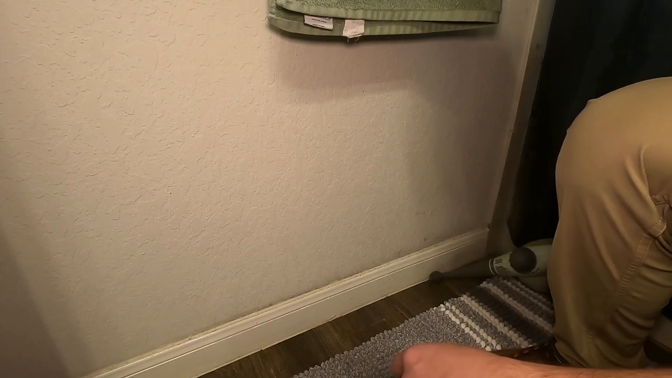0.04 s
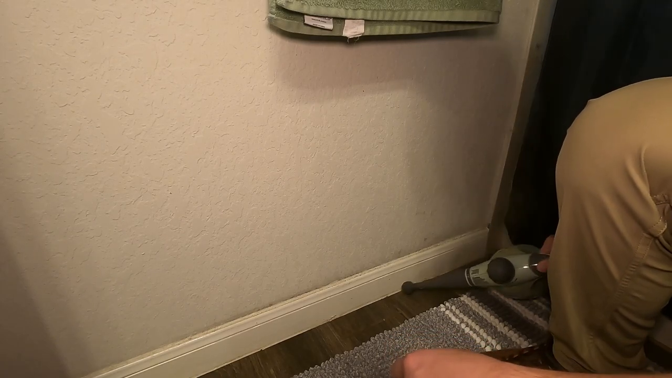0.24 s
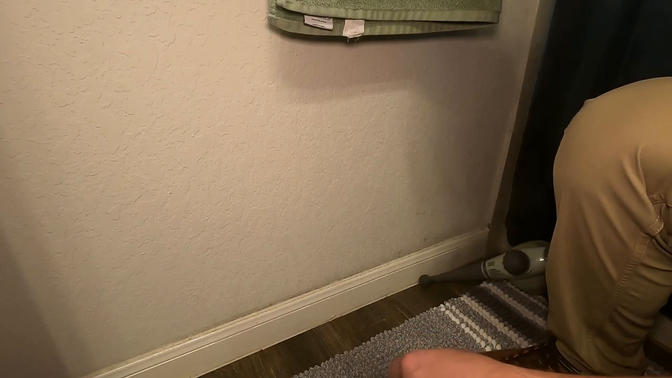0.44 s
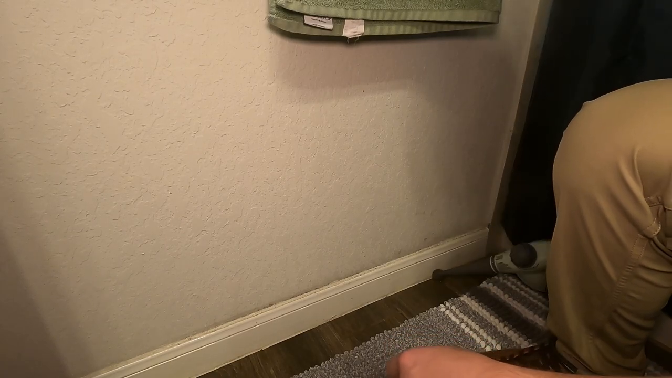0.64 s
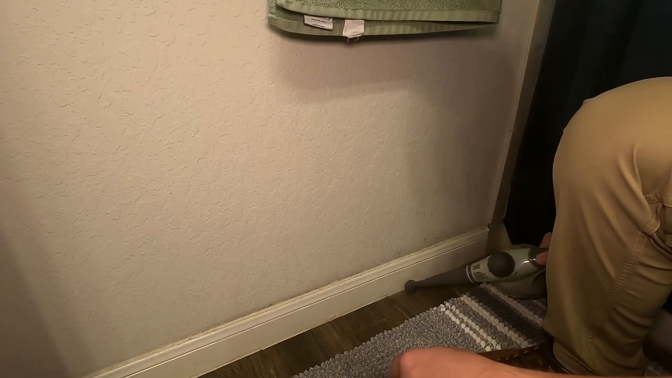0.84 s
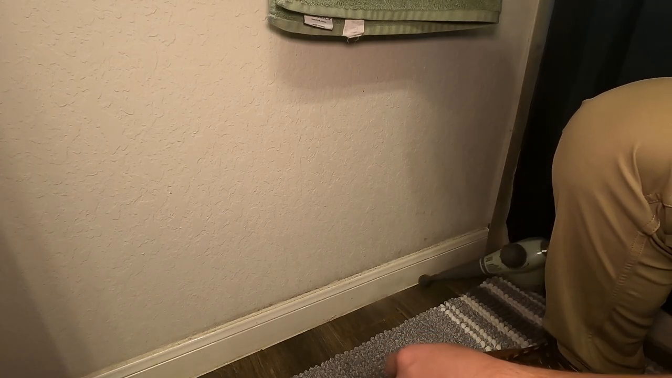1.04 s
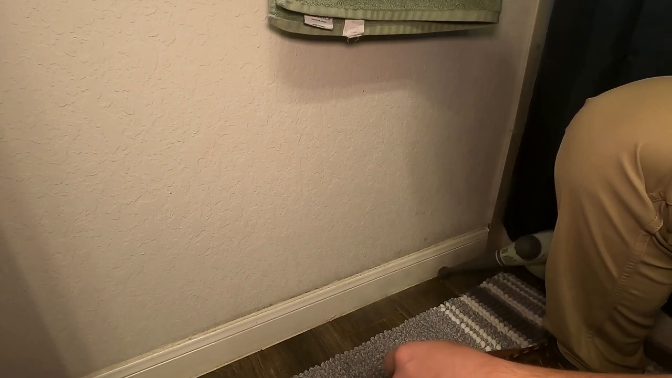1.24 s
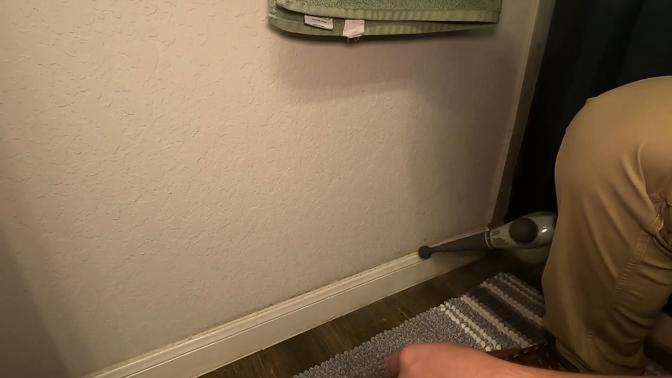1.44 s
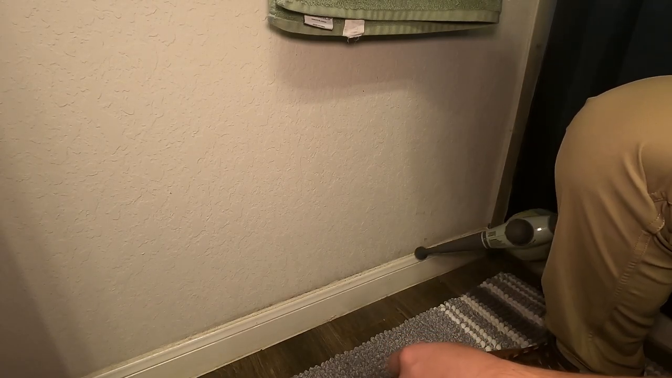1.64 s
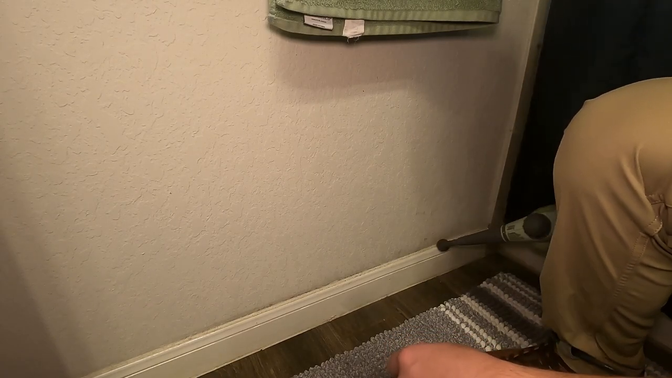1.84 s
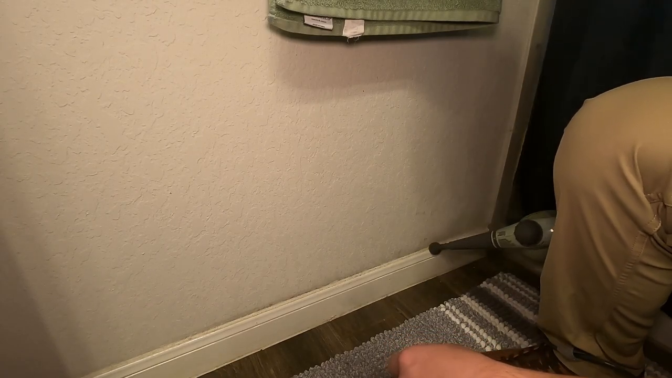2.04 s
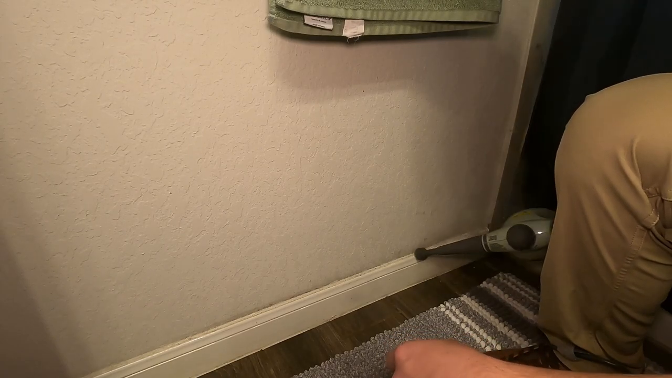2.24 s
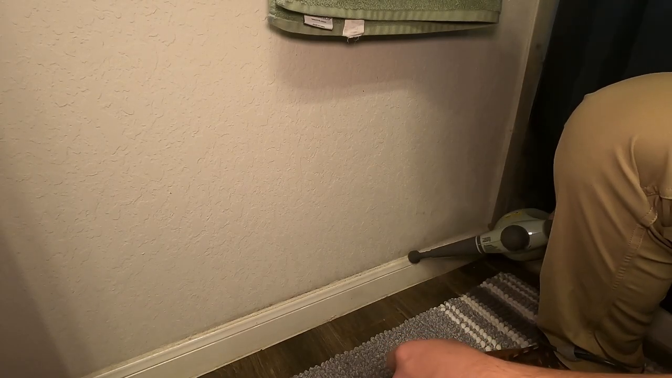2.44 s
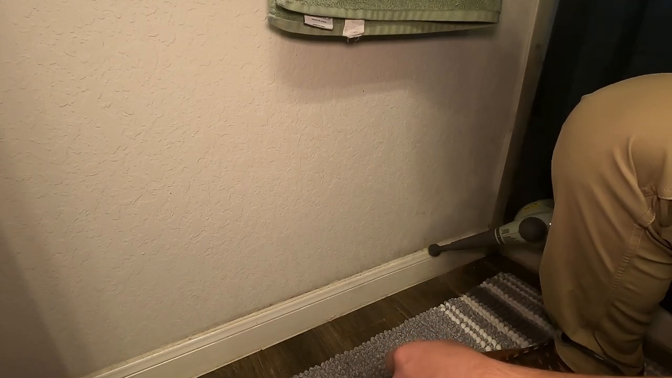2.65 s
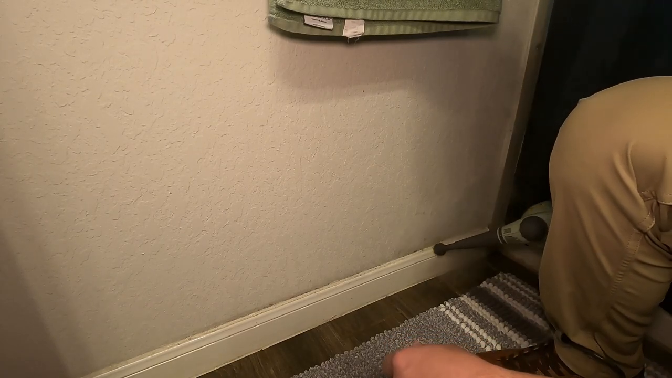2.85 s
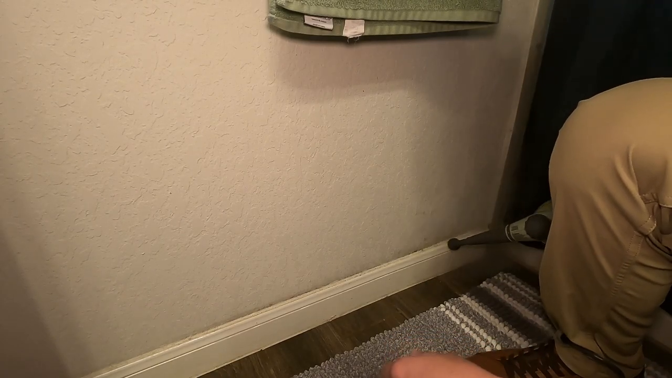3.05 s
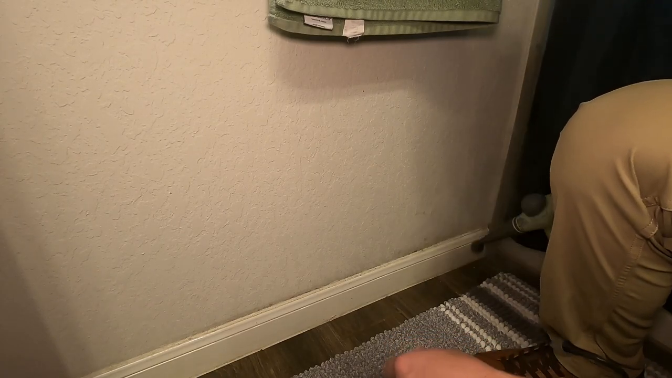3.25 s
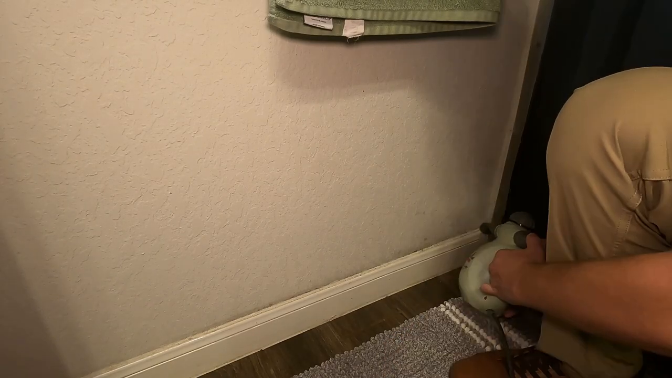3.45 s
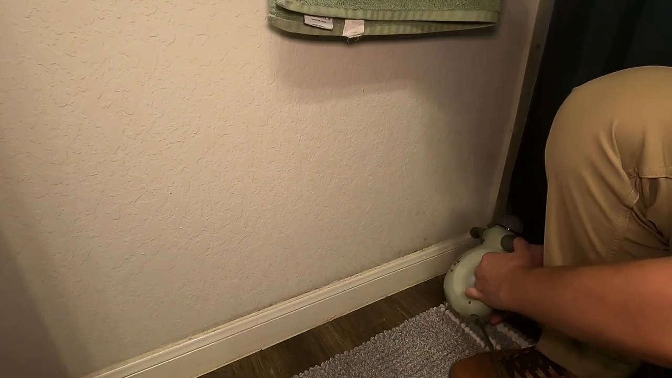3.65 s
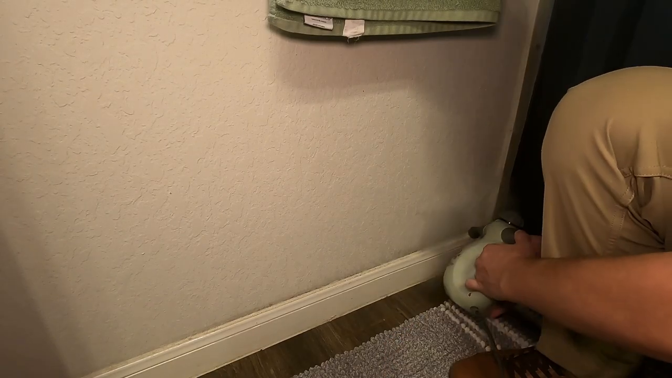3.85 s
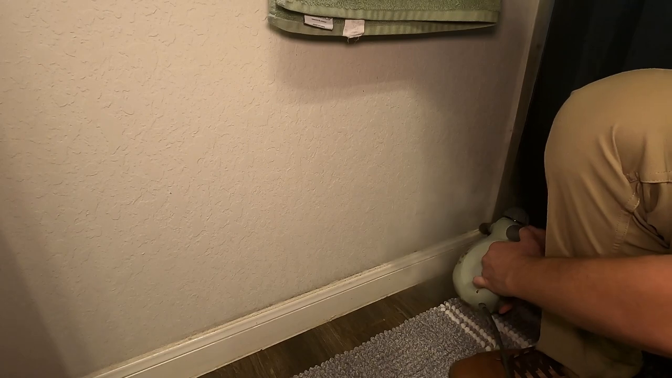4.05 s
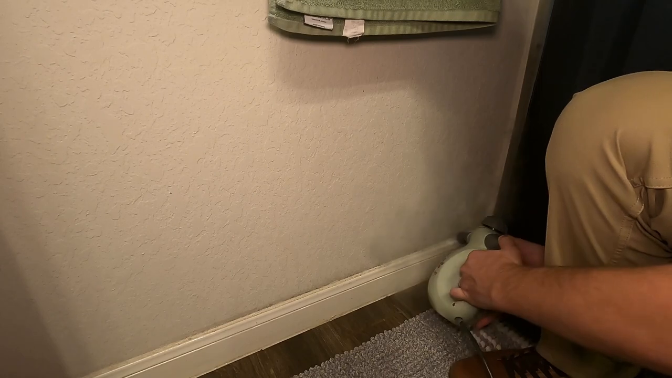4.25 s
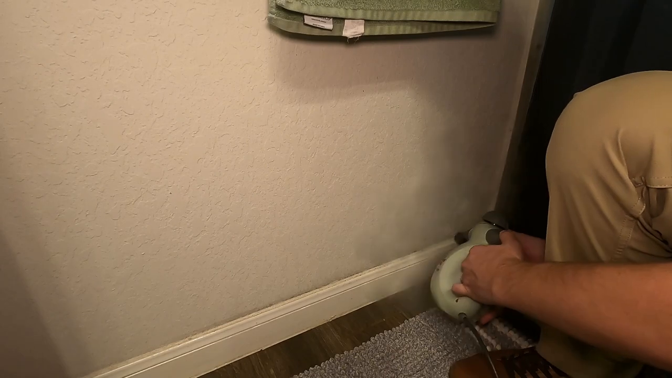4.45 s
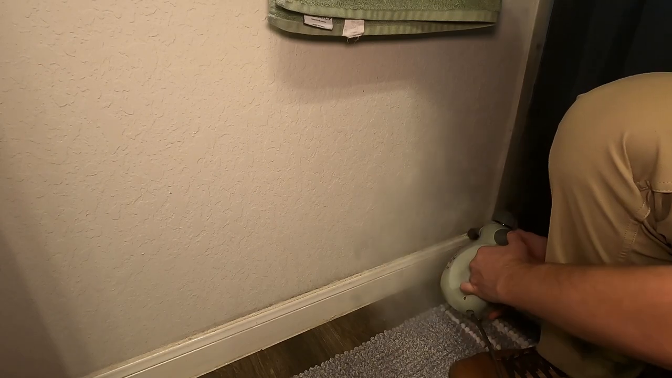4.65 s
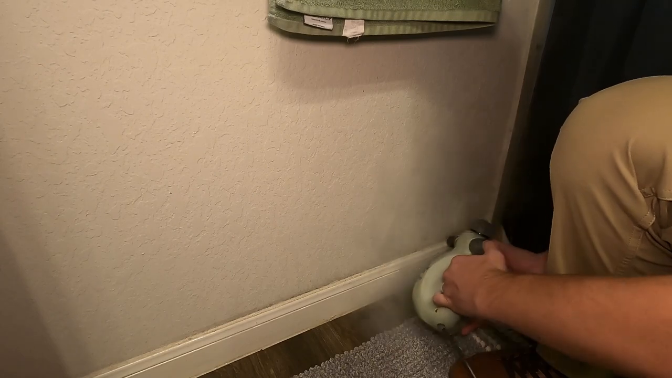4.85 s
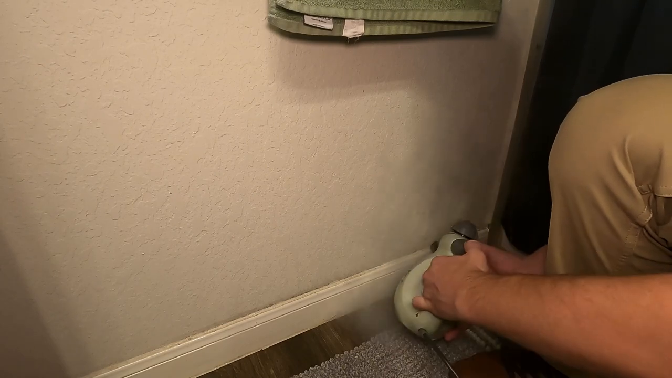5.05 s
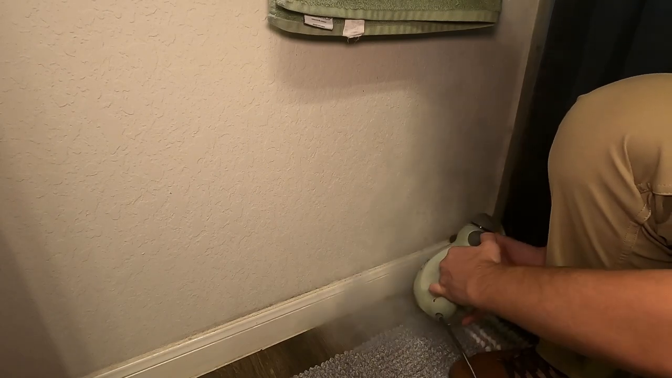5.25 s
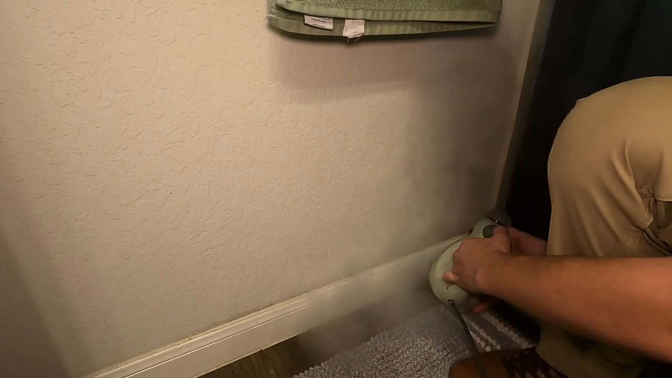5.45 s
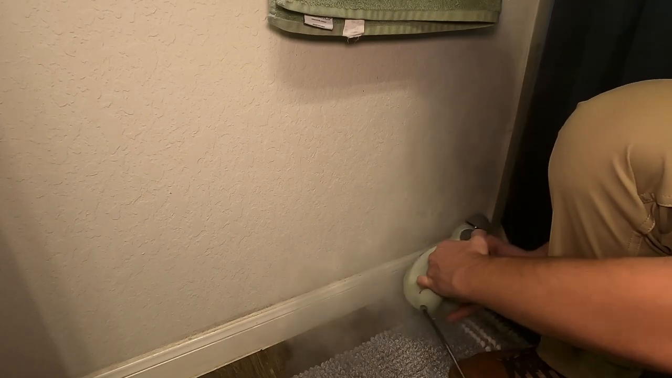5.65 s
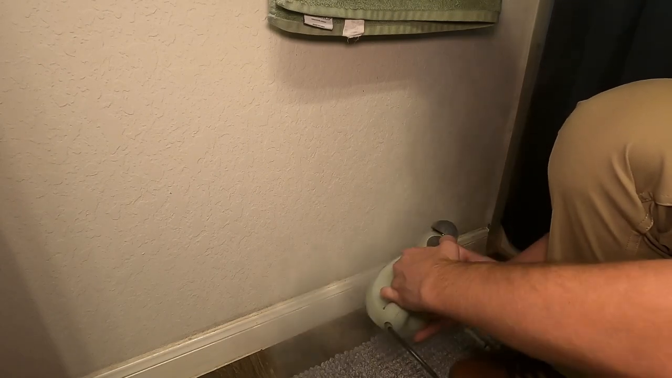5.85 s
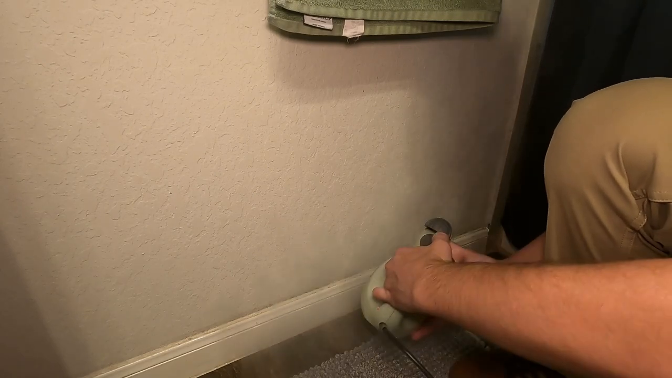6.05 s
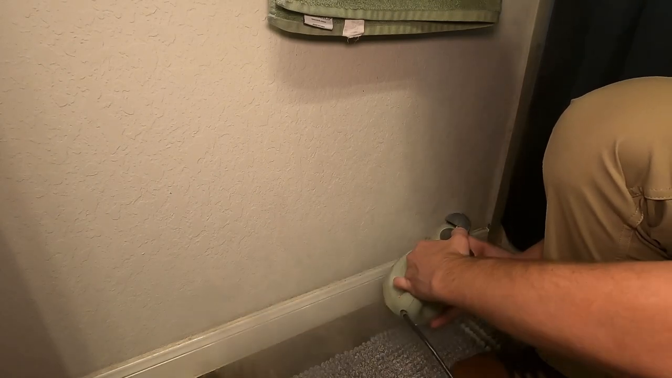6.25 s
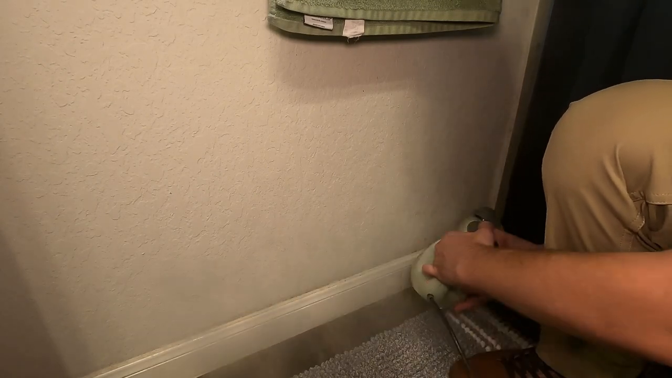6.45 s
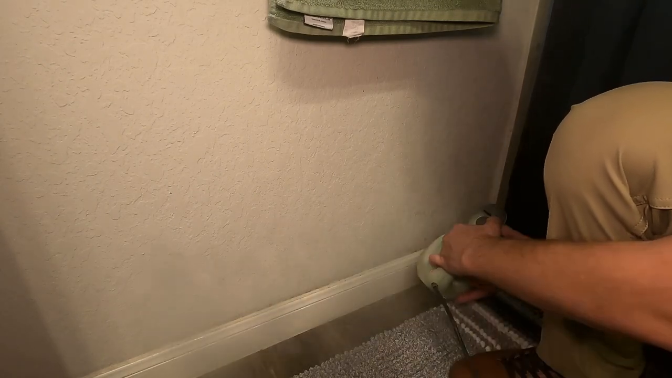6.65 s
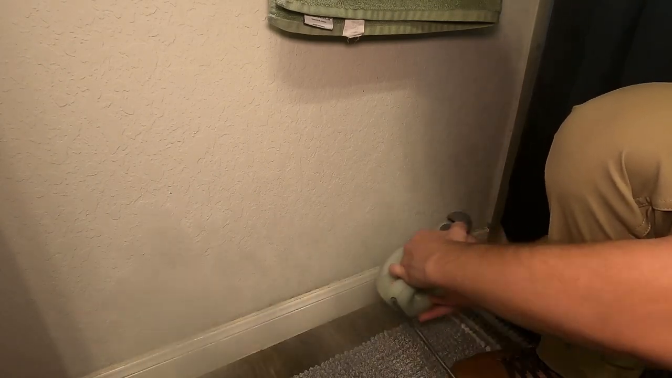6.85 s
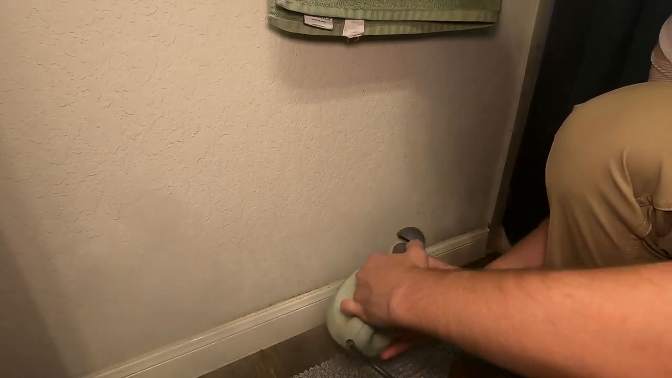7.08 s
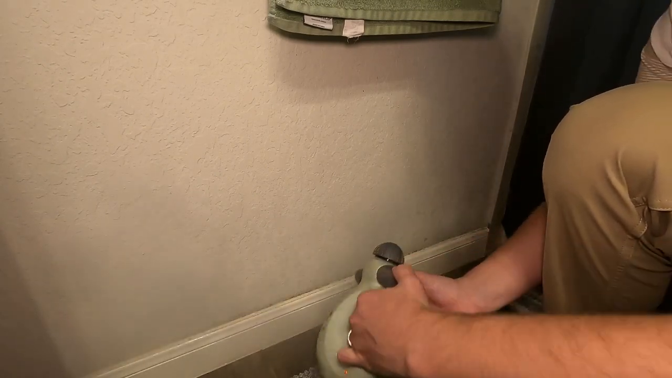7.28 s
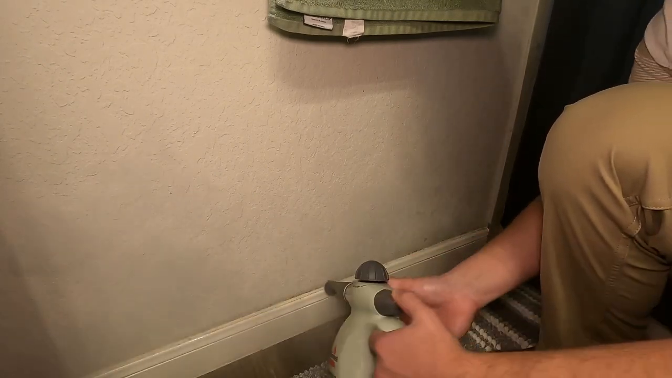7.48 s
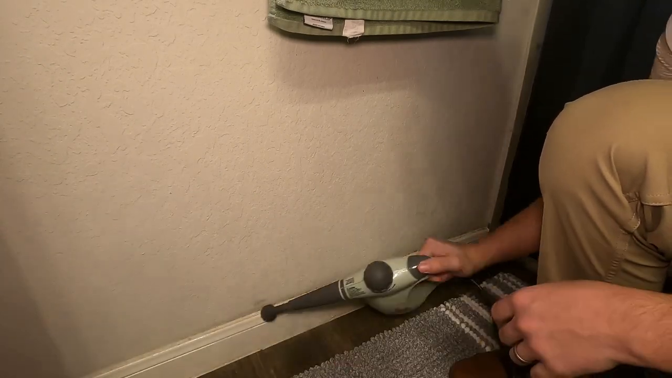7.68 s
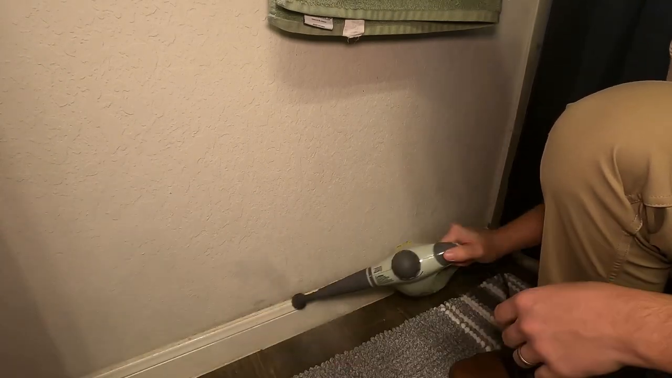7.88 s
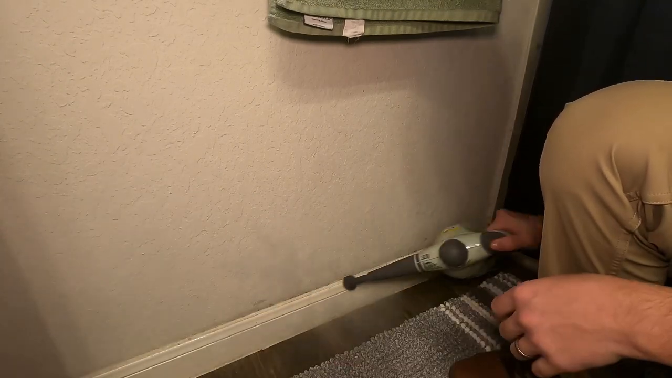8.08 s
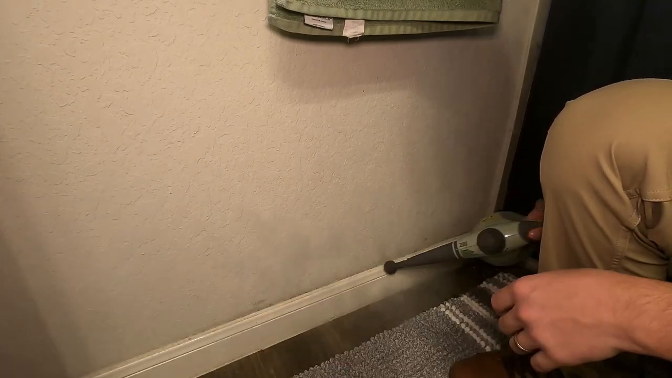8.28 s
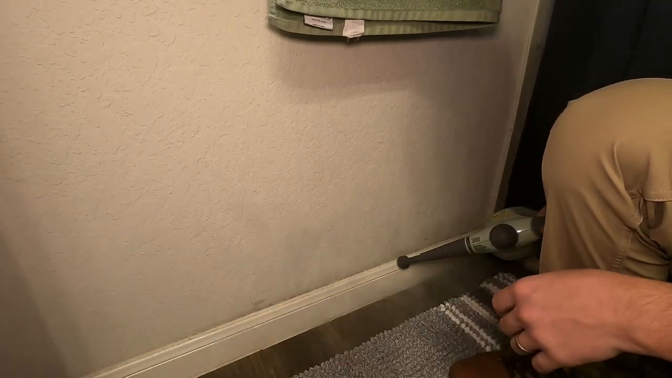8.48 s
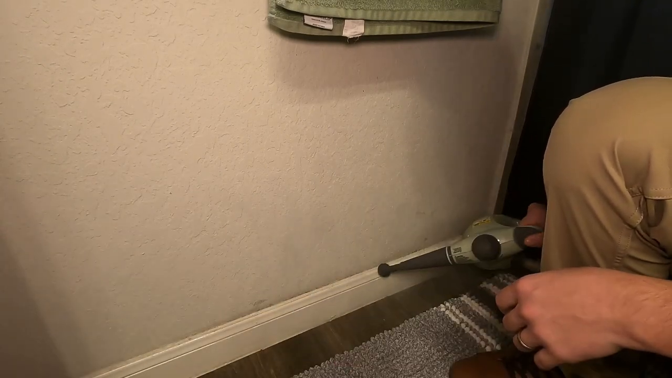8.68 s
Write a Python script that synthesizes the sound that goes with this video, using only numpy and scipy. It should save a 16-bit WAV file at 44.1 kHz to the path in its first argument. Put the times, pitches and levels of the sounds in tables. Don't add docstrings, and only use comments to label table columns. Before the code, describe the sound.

A handheld steam cleaner works close to the microphone in a small tiled bathroom, mono but louder on the left. From the start a loud, bright hiss concentrated around 3 to 5 kHz spits and fizzes while a brush scrubs the skirting board with low woody resonances. It shuts at about 1.6 s, leaving a faint leak and a soft bump, and restarts near 1.85 s, ringing slightly along the board top. A heavier knee thud lands at 3.1 s; the jet cuts at 3.35 s. From 3.6 to 7.5 s a long burst faces the corner, its hollow comb colour sweeping up and down with wet spurts, duller scraping and handling rumble, strongest around 7.2 to 7.5 s. After a brief gap with shuffling, the jet bursts again at 7.76 s, cleaner and less reflected on the open wall, continuing to the end. Low house hum underlies everything.

```python
import sys
import numpy as np
from scipy import signal
from scipy.fft import rfft, irfft
from scipy.io import wavfile
from scipy.ndimage import uniform_filter1d, map_coordinates

SR = 44100
rng = np.random.default_rng(int(sys.argv[2]) if len(sys.argv) > 2 else 0)


def pcm_store(signal):
    levels = np.round(np.clip(np.atleast_2d(signal), -1, 1) * 32767)
    wavfile.write(sys.argv[1], SR, levels.astype(np.int16).T)


def amplitude_ratio(level_db):
    exponent = np.asarray(level_db, float) / 20
    return 10 ** exponent


N = 384552

MOVES_UP_S, CORNER_S, OPEN_S = 1.63, 3.481, 7.718


def level(x, db):
    return x * amplitude_ratio(db) / np.sqrt(np.mean(x ** 2))


def curves(table):
    s, *columns = np.transpose(table)
    return [np.interp(np.arange(N) / SR, s, c) for c in columns]


def walk(rate):
    k = int(SR / rate)
    steps = np.repeat(rng.standard_normal(N // k + 1), k)
    return 1.51 * uniform_filter1d(uniform_filter1d(steps, k), k)[:N]


def colour(x, points):
    hz, db = np.transpose(points)
    f = np.fft.rfftfreq(N, 1 / SR) + 1
    return irfft(rfft(x) * amplitude_ratio(np.interp(np.log(f), np.log(hz), db)), N)


def split(x, edges_hz):
    octave, spec = np.log2(np.fft.rfftfreq(N, 1 / SR) + 1), rfft(x)
    above = [1] + [.5 + .5 * np.tanh(10 * (octave - np.log2(e))) for e in edges_hz] + [0]
    return [irfft(spec * (a - b), N) for a, b in zip(above, above[1:])]


def ring(x, peaks):
    out = 0
    for k, (hz, width, db) in enumerate(peaks):
        out = out + (-1) ** k * amplitude_ratio(db) * signal.lfilter(*signal.iirpeak(hz, hz / width, SR), x)
    return out


def late(x, ms):
    return map_coordinates(x, [np.arange(N) - ms * SR / 1000], order=3)


def held(start, rise, end, fall_db_s):
    s = np.arange(N) / SR
    opening = np.clip((s - start) / max(rise, .002), 0, 1) ** 2
    return opening * amplitude_ratio(-abs(fall_db_s) * np.maximum(s - end, 0))


ROOM_T60_S, ROOM_DB, EARLY_T60_S, EARLY_DB = .22, -9, .03, -9


def room(x, hop=11025):
    t = np.arange(hop) / SR

    def decay(db, t60):
        return amplitude_ratio(db) * np.exp(-np.log(1000) * t / t60) / np.sqrt(t60 * SR / np.log(1e6))

    envelope = np.hypot(decay(EARLY_DB, EARLY_T60_S), decay(ROOM_DB, ROOM_T60_S))
    window = np.sin(np.pi * np.arange(2 * hop) / (2 * hop))
    out, padded = np.zeros(N + 5 * hop), np.pad(x, (hop, 2 * hop))
    for i in range(0, N + hop, hop):
        echoes = rng.standard_normal(hop) * envelope * (t > .0012)
        out[i:i + 3 * hop - 1] += signal.fftconvolve(padded[i:i + 2 * hop] * window, echoes)
    return x + out[hop:hop + N]


# (frequency [Hz], density [dB per Hz])
HUM_COLOUR = [(12, -41), (20, -1), (91, -9), (106, -8.5), (124, 8), (152, -16), (247, -12.5), (300, -31),
              (390, -53), (660, -120)]
HUM_DB = -54.5


def house():
    return level(colour(rng.standard_normal(N), HUM_COLOUR), HUM_DB)


# (opens [s], rise [s], shuts [s], pressure fall [dB per s])
PULLS = [
    (-0.1, .02, 1.583, 215),
    (1.816, .07, 3.345, 150),
    (3.604, .006, 7.51, 180),
    (7.76, 0.033, 8.806, 100),
]
LEAK_DB, PRIME_DB, PRIME_S = -33.5, -23, 0.025
DRAIN_DB, DRAIN_DB_S = -13.5, 62


def trigger():
    s, gain = np.arange(N) / SR, amplitude_ratio(LEAK_DB)
    second_open = PULLS[1][0] + PULLS[1][1]
    for (opens, rise, shuts, fall), last in zip(PULLS, [second_open, CORNER_S, OPEN_S, N / SR]):
        drain = amplitude_ratio(DRAIN_DB) * held(opens, rise, shuts, DRAIN_DB_S)
        jet_open = np.maximum(held(opens, rise, shuts, fall), drain)
        prime = amplitude_ratio(PRIME_DB) * ((s > opens - PRIME_S) & (s < opens + rise))
        gain = gain + (jet_open + prime) * (s < last)
    return 20 * np.log10(gain)


# (time [s], floor bounce lag [ms])
SWINGS = [(0, .21), (.32, .174), (1.17, .46), (1.62, .245), (2.55, .47), (3.4, .21), (3.56, .16),
          (3.71, .185), (3.94, .34), (4.02, .34), (4.2, .16), (4.53, .48), (4.76, .345), (4.92, .34),
          (5.2, .65), (5.61, .32), (5.73, .305), (6.1, .87), (6.2, .89), (6.76, .32), (6.87, .33),
          (7.21, .897), (7.45, .72), (7.68, .7), (7.77, .28), (8.72, .23)]
WALL_LATER_MS, TREMOR_MS = 0.27, .012
FLOOR_NEAR, FLOOR_PER_MS, WALL_NEAR, WALL_PER_MS = .66, -.45, .1, .22
MIRROR_FACING, MIRROR_OPEN = 0.29, 0.082
CLOUD_DB = 3
DWELL_DB, DWELL_MS_S = -5, .3


def nozzle():
    s, (at, ms) = np.arange(N) / SR, np.transpose(SWINGS)
    place = np.interp(s, at, np.arange(len(at)))
    eased = np.floor(place) + .5 - .5 * np.cos(np.pi * (place % 1))
    floor_ms = np.interp(eased, np.arange(len(at)), ms)
    speed_ms_s = uniform_filter1d(np.abs(np.gradient(floor_ms)) * SR, size=6615)
    dwell = np.exp(-speed_ms_s / DWELL_MS_S) * (s > SWINGS[10][0])
    floor_ms = floor_ms + TREMOR_MS * walk(9.8)
    mirror = np.where(s < CORNER_S, MIRROR_FACING, np.where(s < OPEN_S, 1, MIRROR_OPEN))
    mirror = mirror * amplitude_ratio(CLOUD_DB * walk(7) + DWELL_DB * dwell)
    floor = np.clip(mirror * (FLOOR_NEAR + FLOOR_PER_MS * floor_ms), 0, .9)
    wall = np.clip(mirror * (WALL_NEAR + WALL_PER_MS * floor_ms), 0, .9)
    return (floor_ms, floor_ms + WALL_LATER_MS), (floor, wall)


# (frequency [Hz], density [dB per Hz])
JET_COLOUR = [(1290, -37), (2200, -28.5), (2790, -7.5), (3210, 4.5), (3430, 5), (4210, -7), (5610, -4.5),
              (7910, -18), (8950, -27), (11100, -24), (13700, -20), (15600, -23.5)]
JET_COLOUR_OPEN = [(1180, -49), (2000, -35), (2870, -6.5), (3530, 0.5), (4810, -0.5), (7990, -14),
                   (9410, -27), (10800, -22), (15600, -34)]
# (frequency [Hz], width [Hz], level [dB])
NOZZLE_RING = [(3310, 260, 0.5)]
SPIT_RATE, SPIT_SPREAD_DB, SPIT_DB = 1500, 6.5, -7.5


def spitting_hiss():
    s = np.arange(N) / SR
    size_db = np.minimum(SPIT_SPREAD_DB * rng.exponential(size=N), 9)
    drops = (rng.random(N) < SPIT_RATE / SR) * rng.choice([-1, 1], N) * amplitude_ratio(size_db)
    flow = rng.standard_normal(N) + level(drops, SPIT_DB)
    source = np.where(s < OPEN_S, colour(flow, JET_COLOUR), colour(flow, JET_COLOUR_OPEN))
    along_top = (s < CORNER_S) * (s > MOVES_UP_S)
    return source + ring(source, NOZZLE_RING) * along_top


# (time [s], flow [dB], aim: share in the ridge near 3.3 kHz [dB], sharpness: tilt across the
# hiss above the ridge [dB])
FLOW = [
    [(0.0, -24.5, -6, -2), (0.056, -23.5, -10, -6.5), (0.112, -25.5, -3, -1.3), (0.452, -21.5, -9, 2),
     (0.646, -25.5, -2, -0.5), (0.966, -22.5, -6.5, 4.9), (1.35, -23, -6, 0.2), (1.55, -24.5, -11, -4.5)],
    [(1.89, -21, -2.5, -0.5), (2.342, -24.5, -3, 2), (2.398, -20.5, -9, -4.7), (2.612, -30, -1, 0.8),
     (2.766, -20, -5, -2), (2.798, -22, -1.5, 1), (3.254, -26, -3, 3.5), (3.34, -26, -2, 0.5)],
    [(3.63, -20, -4, 2), (3.71, -19.5, -7, 3), (3.83, -24.5, -2, 0), (4.09, -24.5, -3, -0.5),
     (4.35, -23.5, -3.5, 0), (4.9, -22, -4.5, -1.5), (5.4, -24, -5.5, 0), (6.22, -24, -7.5, 0),
     (7.5, -25, -4.5, 0)],
    [(7.8, -19, -1, 1.3), (7.958, -22.5, -3, 2), (8.34, -23.5, -4.5, 0.2), (8.672, -22, -7.5, 0.3),
     (8.68, -22.5, -8, -0.1)],
]
# (time [s], swell [dB], length [s], extra ridge [dB])
SPURTS = [(1.921, -5.5, 0.014, -1.5), (1.945, .3, .02, 2), (4.165, 0.5, 0.087, -5.5), (4.532, -1, 0.1, -3),
          (4.992, -3.5, 0.044, -1), (5.14, -0.5, .08, 3), (5.51, -1.5, 0.058, -3.5), (5.66, -2, .03, -0.5),
          (5.828, -4, 0.044, -1), (6.2, 1, .08, 1), (6.39, -4, .04, -1), (6.601, -.5, .06, -3),
          (6.769, 3, 0.0089, 4), (6.805, 2.5, 0.06, 2.5), (6.907, -3, 0.069, -2), (7.225, 2, .06, 1),
          (7.81, -2, .03, -1)]
# (time [s], fizz [dB], fineness of the droplets [dB])
WET = [
    [(0.0, -49.5, -3), (0.374, -44.5, 1), (0.586, -64.5, 19), (0.854, -48.5, -5), (0.898, -40, -8),
     (1.276, -54, 3), (1.302, -46, -11), (1.528, -41, -3), (1.55, -49, 2)],
    [(1.89, -45, -3), (2.172, -37.5, -8), (2.394, -49, 5), (2.862, -48, -17), (2.952, -52, -17),
     (2.98, -44, -7), (3.262, -45, -15), (3.34, -50, -4)],
    [(3.63, -42.5, 3), (3.76, -40, -8), (3.92, -55, 8), (4.33, -41.5, -8), (5.5, -41.5, -3),
     (5.68, -50.5, 3), (5.97, -43, -1.5), (7.48, -45.5, 0), (7.5, -46, -6)],
    [(7.8, -50, 2), (7.876, -41.5, -5), (8.662, -45, 0), (8.72, -40, -4)],
]
# (frequency [Hz], level [dB])
BOUNCE = [(3000, -8), (4700, 0), (6500, 0), (8500, -10), (16000, -18)]
FIZZ_DIES = 0.93
FLICKER_DB, PATCH_DB, SHARED_DB = 1.5, 1.01, -0.05
FIZZ_PATCHY = 2.2


def jet():
    valve_db = trigger()
    jet_db, ridge_db, sharp_db = curves(np.vstack(FLOW))
    wet_db, fine_db = curves(np.vstack(WET))
    for s, db, length, more_db in SPURTS:
        slug = np.exp(-((np.arange(N) / SR - s) / length) ** 2)
        jet_db, ridge_db = jet_db + db * slug, ridge_db + more_db * slug
    jet_db = jet_db + valve_db
    fizz_db = wet_db + FIZZ_DIES * valve_db
    finest_db = fizz_db + fine_db
    hiss_db = 10 * np.log10(np.clip(1 - amplitude_ratio(ridge_db) ** 2, .13, 1))

    source = spitting_hiss()
    (floor_ms, wall_ms), (floor, wall) = nozzle()
    mirror = colour(source, BOUNCE)
    heard = room(source + floor * late(mirror, floor_ms) + wall * late(mirror, wall_ms))

    bands_heard = np.array(split(heard, [3100, 3800, 5000, 6200, 8300, 10000, 12000, 13700]))
    regions = np.split(bands_heard, [2, 5, 7])
    regions[1] *= amplitude_ratio(np.outer([-1, 0, 1], sharp_db))
    levels_db = [jet_db + ridge_db, jet_db + hiss_db, fizz_db, finest_db]
    shared, out = walk(7.7), 0
    for bands, db, patchy in zip(regions, levels_db, [1, 1, FIZZ_PATCHY, FIZZ_PATCHY]):
        even = np.sqrt(uniform_filter1d(bands.sum(0) ** 2, 6615))
        wobble = []
        for _ in bands:
            patches_db = SHARED_DB * shared + patchy * PATCH_DB * walk(6.8)
            wobble.append(amplitude_ratio(patches_db + np.sqrt(patchy) * FLICKER_DB * walk(28)))
        out = out + amplitude_ratio(db) * (bands * wobble).sum(0) / even
    return out


# (start [s], length [s], scrub [dB], rumble [dB])
STROKES = [(0.143, 0.19, -40.5, -46), (0.296, 0.16, -45.5, -66), (0.645, 0.061, -45, -70),
           (0.733, 0.39, -37.5, -42.5), (1.18, 0.34, -39, -40), (1.62, .13, -47, -46),
           (1.828, 0.05, -40.5, -40), (2.043, 0.16, -41, -43.5), (2.31, 0.25, -39, -43),
           (2.627, 0.37, -37.5, -44.5), (3.107, 0.22, -43, -38.5), (3.48, 0.11, -45.5, -44),
           (3.593, 0.037, -39, -45), (4.012, 0.089, -65, -45.5), (4.123, 0.034, -45, -42),
           (4.593, 0.14, -50.5, -54), (4.98, 0.15, -58, -46), (5.3, 0.088, -53, -39),
           (5.78, 0.13, -50, -48.5), (5.95, 0.11, -48.5, -39.5), (6.237, 0.16, -54, -42.5),
           (6.415, 0.31, -47.5, -45), (7.005, 0.12, -49.5, -39.5), (7.15, 0.19, -47, -35),
           (7.386, 0.28, -45, -34), (7.696, .12, -46, -46.5), (8.314, 0.043, -51, -49)]
STROKE_RISE_S, STROKE_FALL_DB_S = 0.055, 125
REST_SCRUB_DB, REST_RUMBLE_DB = -51, -56.5
RASP_DB, RASP_CORNER_DB, SKIRT_DB, SKIRT_CORNER_DB = -2, -11.5, -21, -28.5


def strokes(valve_db):
    shapes = np.array([held(s - STROKE_RISE_S / 2, STROKE_RISE_S, s + length, STROKE_FALL_DB_S)
                       for s, length, _, _ in STROKES])
    peaks = amplitude_ratio(np.array(STROKES)[:, 2:].T)
    scrub, rumble = np.sqrt(peaks ** 2 @ shapes ** 2)
    facing = np.arange(N) < CORNER_S * SR
    flow_db = curves(np.vstack(FLOW))[0] + valve_db
    skirt = amplitude_ratio(flow_db + np.where(facing, SKIRT_DB, SKIRT_CORNER_DB))
    rasp = np.hypot(scrub * amplitude_ratio(np.where(facing, RASP_DB, RASP_CORNER_DB)), skirt)
    return np.hypot(scrub, amplitude_ratio(REST_SCRUB_DB)), rasp, np.hypot(rumble, amplitude_ratio(REST_RUMBLE_DB))


# (frequency [Hz], width [Hz], level [dB])
BOARD_FOOT = [(189, 9.3, -5), (379, 52, 0), (577, 86, -5), (851, 8.4, 2)]
BOARD_TOP = [(321, 60, -1), (580, 110, 2), (834, 10, -14)]
PANEL = [(187, 37, 9), (120, 50, -20)]
# (frequency [Hz], density [dB per Hz])
RASP_FACING = [(590, -37), (1000, -18), (1170, -6), (1400, -7), (1520, -4), (2190, -6), (2600, 0),
               (3380, -3.5), (5720, -120)]
RASP_CORNER = [(590, -78), (1000, -11.5), (1140, 2), (2090, -4.5), (2300, -6), (2990, -16), (5060, -120)]
RUMBLE = [(47, -46), (80, -3.5), (108, -2.5), (205, 0), (247, -1.5), (300, -19), (390, -54), (660, -120)]


def brush():
    scrub, bristles, hand = strokes(trigger())
    s = np.arange(N) / SR
    at_foot, facing = s < MOVES_UP_S, s < CORNER_S
    slips = room(rng.standard_normal(N) * amplitude_ratio(1.2 * walk(40)))
    rung = np.where(at_foot, level(ring(slips, BOARD_FOOT), 0.37), level(ring(slips, BOARD_TOP), 0.2))
    bed = level(split(slips, [285, 1000])[1], -6)
    board = np.where(facing, split(rung, [1000])[0] + bed, amplitude_ratio(6.0) * bed)
    rasp = np.where(facing, level(colour(slips, RASP_FACING), 3.6), level(colour(slips, RASP_CORNER), .3))
    push = rng.standard_normal(N) * amplitude_ratio(3.1 * walk(15))
    panel = level(ring(ring(push, PANEL), [(170, 120, 0)]), -1.9)
    rumble = np.where(at_foot, panel, level(colour(push, RUMBLE), -2.2))
    return scrub * board + bristles * rasp + hand * rumble


# (time [s], peak [dB], ring [Hz], t60 [s], deep thud [dB relative])
BUMPS = [(0.148, -31.5, 170, 0.54, -31), (0.755, -31.5, 205, 0.32, -33), (1.659, -24, 132, 0.2, -22),
         (2.069, -29, 168, 0.21, -29), (2.17, -26, 82, 0.17, -15), (2.437, -32, 115, 0.43, -27),
         (2.839, -30, 90.5, 0.14, 2), (3.107, -14, 104.6, 0.32, -6.5), (3.16, -25.5, 236, 0.22, -3),
         (3.511, -34, 127, 0.37, -20), (3.591, -30.5, 103, 0.27, -20), (4.004, -42, 147, 0.17, 0),
         (4.137, -38, 246, 0.18, -17), (4.608, -38, 106, 0.42, -5), (5.32, -31.5, 112, 0.52, -16),
         (5.808, -36, 230, 0.17, -31), (6.23, -35, 108, 0.34, -4), (7.787, -30.5, 128.6, 0.42, -15)]


def bumps():
    out, t = np.zeros(N + SR), np.arange(SR // 2) / SR
    for s, db, hz, t60, deep_db in BUMPS:
        fade = np.exp(-np.log(1000) * t / max(t60, .03)) * (1 - np.exp(-t / 0.0017))
        turn = 2 * np.pi * hz * t
        knock = np.sin(turn) + 0.22 * np.sin(3.0 * turn) + 0.22 * np.sin(3.1 * turn)
        rattle = level(ring(rng.standard_normal(len(t)), [(hz, 40, 0), (1.98 * hz, 90, -6)]), -13.5)
        thud = level(ring(rng.standard_normal(len(t)), [(52.3, 19, 0)]), deep_db - 7.5)
        start = int(s * SR)
        out[start:start + len(t)] += amplitude_ratio(db) * (fade ** 2 * knock + np.sqrt(fade) * (rattle + thud))
    return out[:N]


RIGHT_DB = -6.2


def scene():
    mono = (house() + jet() + brush() + bumps()) * amplitude_ratio(2.0)
    return mono * np.array([[1], [amplitude_ratio(RIGHT_DB)]])


def top_cut(x):
    return signal.sosfilt(signal.butter(12, 15780, fs=SR, output="sos"), x)


MASK_HZ, MASK_DB = 8800, -57


def record(dry):
    hz, _, spec = signal.stft(dry, SR, nperseg=1024)
    power = np.abs(spec[:1]) ** 2
    hiss_power = power[:, hz > MASK_HZ / 4].sum(1, keepdims=True)
    faint = uniform_filter1d(power, size=4, axis=1) < hiss_power * amplitude_ratio(MASK_DB) ** 2
    masked = (hz[:, None] > MASK_HZ) & faint
    mix = signal.istft(spec * ~masked, SR, nperseg=1024)[1][:, :N]
    return top_cut(mix)


dry = scene()
out = record(dry)
pcm_store(out)
```